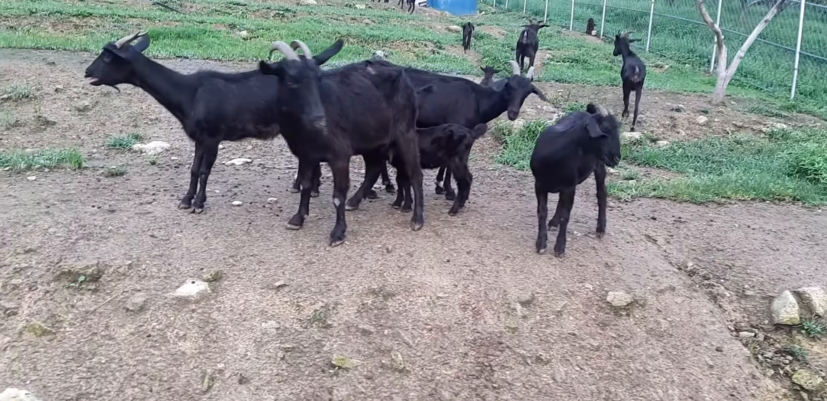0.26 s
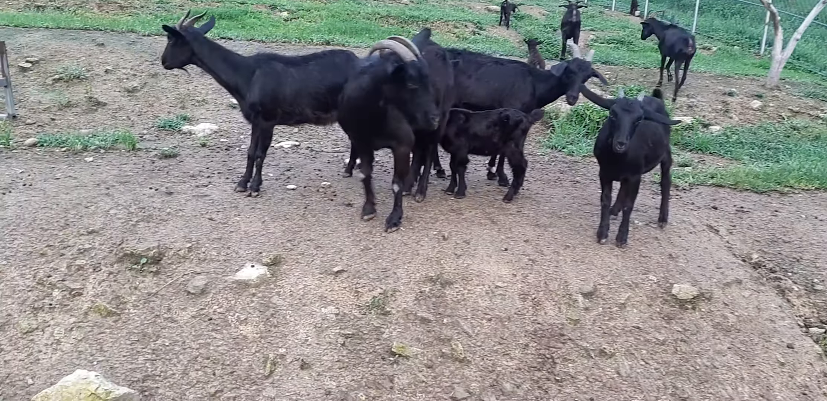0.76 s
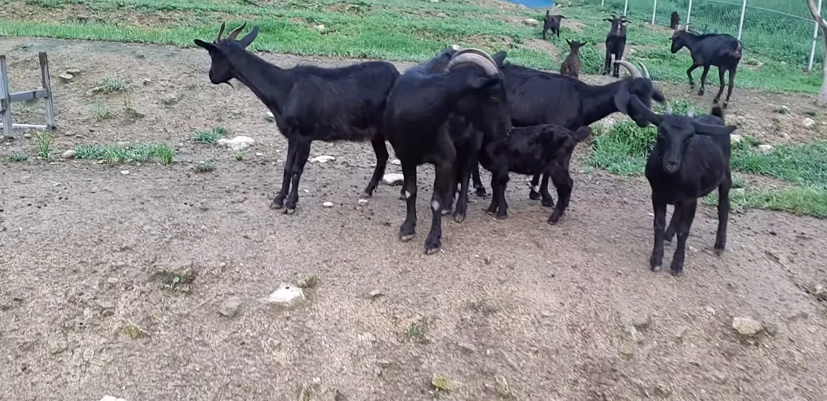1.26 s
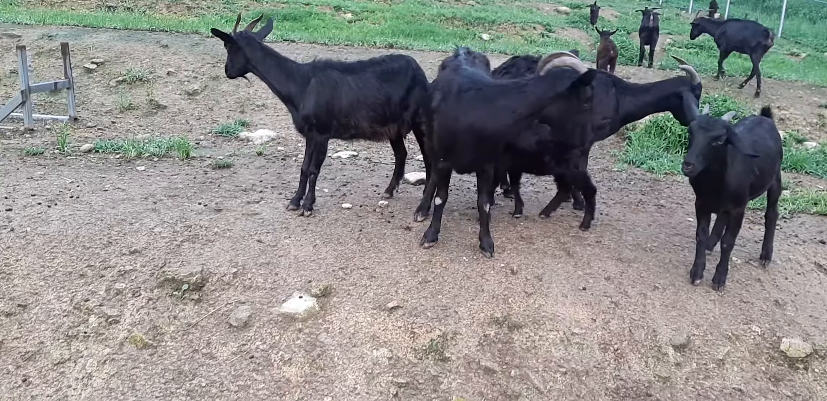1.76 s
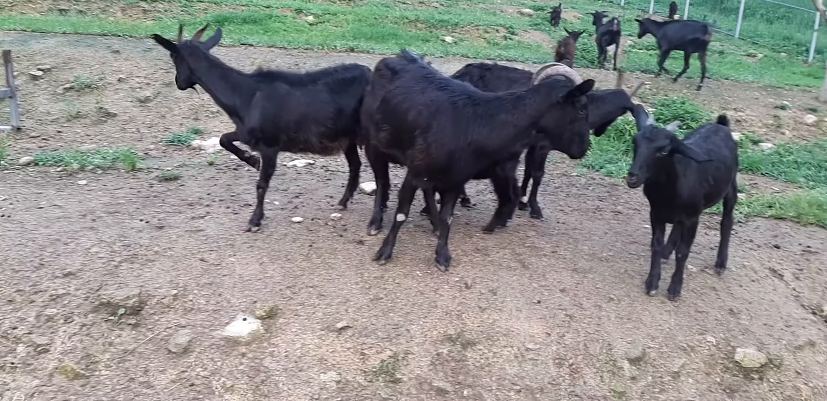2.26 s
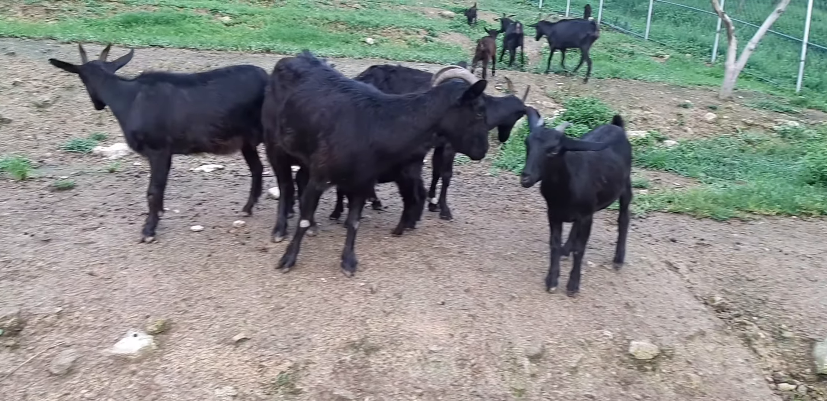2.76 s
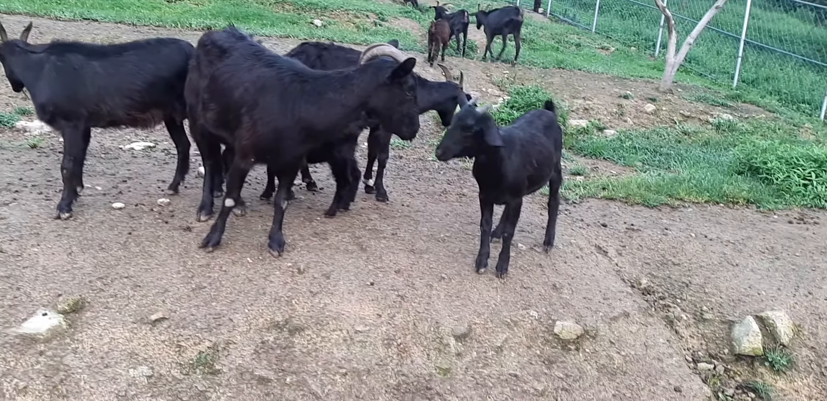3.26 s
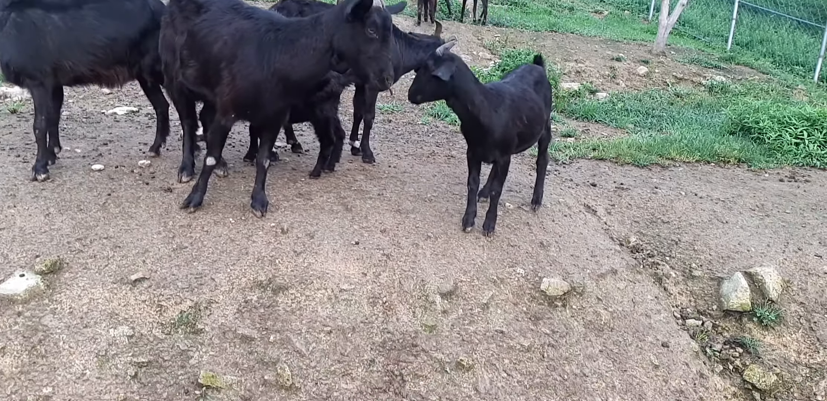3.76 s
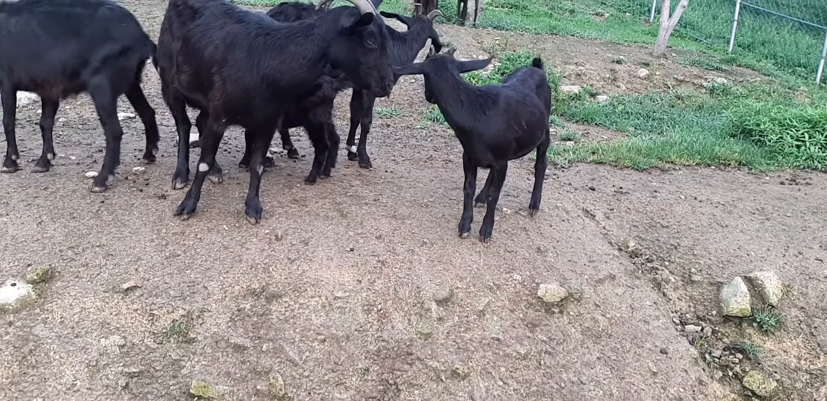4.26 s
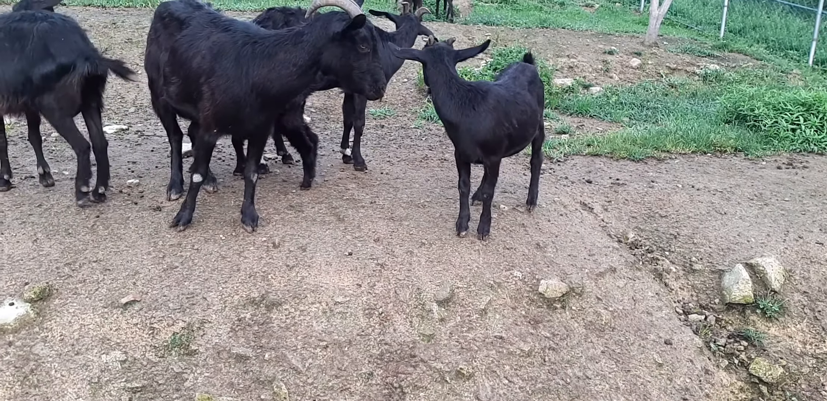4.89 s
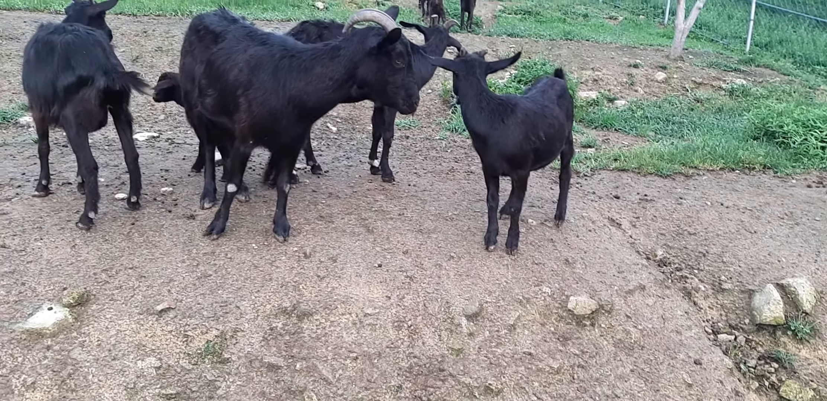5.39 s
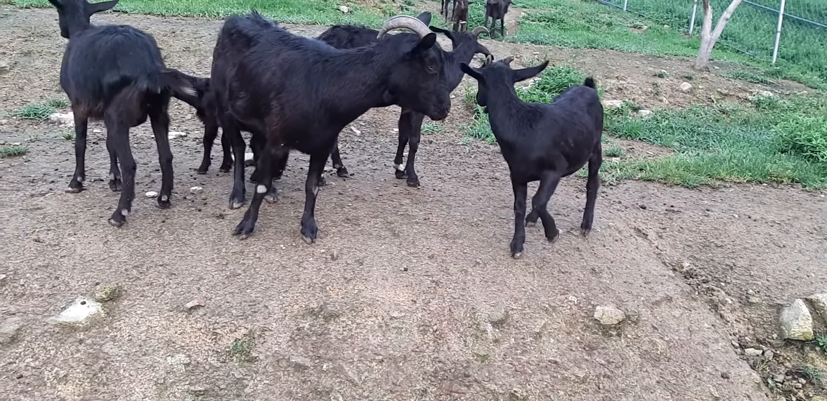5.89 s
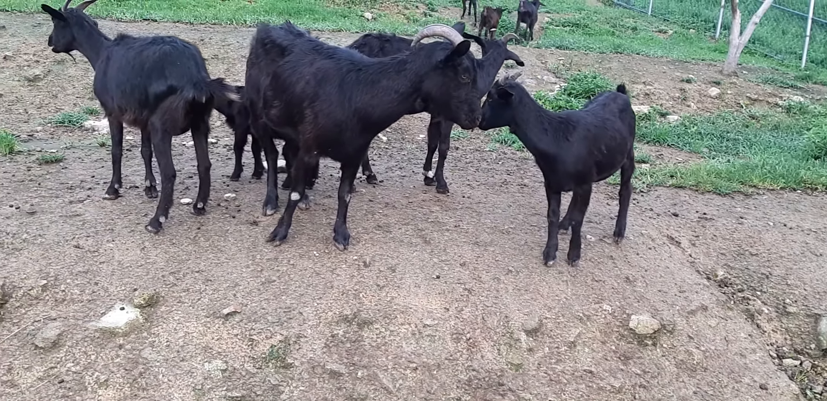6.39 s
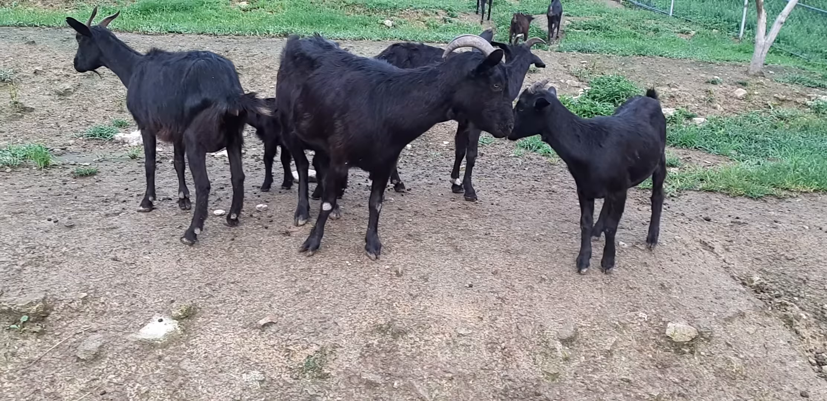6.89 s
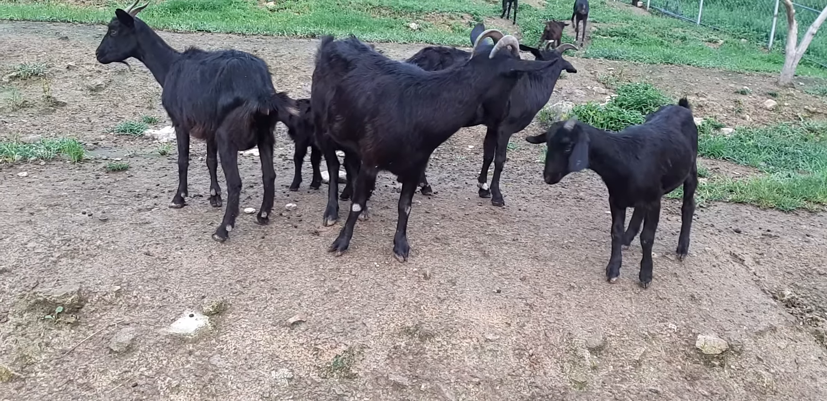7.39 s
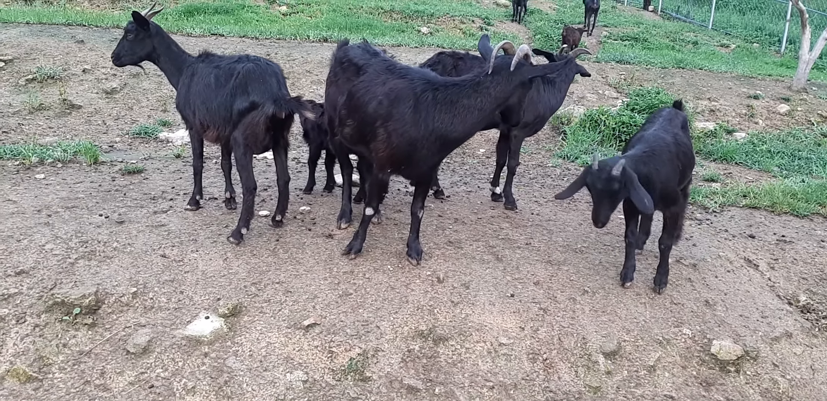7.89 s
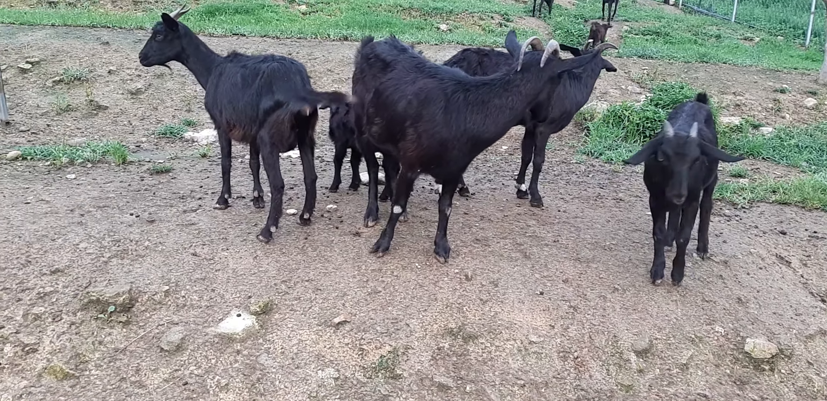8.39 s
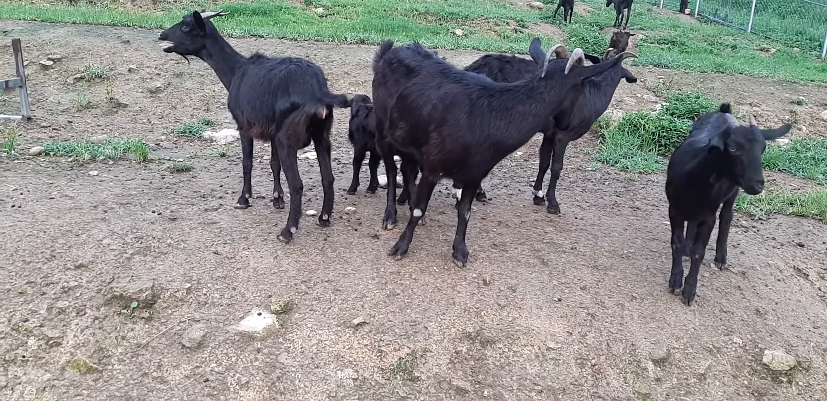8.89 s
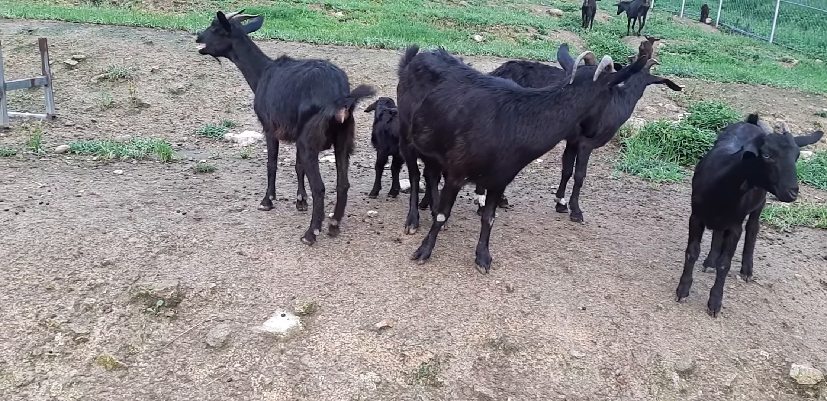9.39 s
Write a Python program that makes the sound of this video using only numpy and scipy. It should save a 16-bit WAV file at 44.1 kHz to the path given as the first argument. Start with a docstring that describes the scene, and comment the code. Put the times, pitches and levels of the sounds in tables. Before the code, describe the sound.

A close goat's raspy, throbbing bleat is already under way and quickly fades. A kid gives a clear, falling cry, then a hoarse adult answers with a long quaver. After fainter distant calls, she bleats again while a bird chatters. A quieter gap follows before the loudest bleat near the end. Insects hiss steadily, stronger on the right. Outdoor stereo pickup on an open hillside, with only a short dull echo.

```python
"""Two near goats bleat with a strong quaver; a kid gives one clear cry and others answer from further off.
Voices are larynx pulses and breath filtered by nose and throat; effort and throbs drive pitch and level.
A hoof thuds now and then (decaying sines), a far bird chatters (hoarse sine glides).
Insects hiss steadily, louder on the right (coloured noise and chirps), over faint air noise.
The open hillside scatters a short dull echo of goats, hooves and bird."""
import sys
import numpy as np
from scipy import signal
from scipy.fft import rfft, irfft, next_fast_len
from scipy.io import wavfile
from scipy.ndimage import uniform_filter1d, map_coordinates

SR = 44100
rng = np.random.default_rng(int(sys.argv[2]) if len(sys.argv) > 2 else 0)


def store_wav(level_fs):
    """Save 16-bit WAV to argv[1]."""
    pcm = np.round(np.clip(np.atleast_2d(level_fs), -1, 1) * 32767)
    wavfile.write(sys.argv[1], SR, pcm.T.astype(np.int16))


N = 425565

# quavering bleats by name: first_throb_s, last_throb_s, throb_count,
#   slowing (gap growth per squared distance from the quickest place), quickest_place (0-1),
#   full_pitch_hz, full_level_db, fading_db_per_s, first_effort (0-1), last_effort (0-1),
#   mouth_opens_s, muffling_until_then_db, lull_dip_db
QUAVERS = { "lead, tiring": (-.018, .447, 5, -.15, .6, 306, -28.8, 13, .98, .56, -.2, 0, 19),
           "lead, loud": (8.569, 9.671, 11, .68, .37, 319, -25.1, .8, .6, .68, 8.63, 13, 11),
           "doe, first": (2.62, 3.478, 9, .1, .55, 330, -26.8, 0, .47, .57, 2.715, 0, 11.5),
           "doe, second": (5.578, 6.286, 8, .2, .75, 326, -29, 0, .47, .95, 5.73, 7, 8),
           "far": (3.541, 4.096, 7, .33, .2, 358, -48.5, 11, .95, .92, 3.4, 0, 8.5)}
# single low pushes: centre_s, length_s, pitch_hz, glide_share_per_s, level_db, mouth_opening (0-1)
GRUNTS = [(.524, .08, 239, 0, -36, .72), (2.485, .12, 162, 1.5, -49, .02),
          (3.578, .08, 208, -3, -43.5, .15), (5.44, .09, 178, 0, -48.5, .03),
          (6.385, .19, 189, -.6, -46.5, .9), (8.44, .08, 186, 0, -51, .04)]
# held bleats by name: start_s, end_s, pitch_hz, level_db, attack_s, release_s, glide_share_per_s, waver_share
HELD = {
    "kid, yelp": (1.35, 1.44, 305, -40, .035, .035, 0, 0),
    "kid, lead-in": (1.465, 1.83, 343, -37.8, .045, .002, 0, 0),
    "low": (.6, 1.57, 210.5, -46.3, .012, .06, -.055, .11),
    "high": (5.47, 6.42, 475, -50, .05, .11, 0, .01),
    "first hum": (-.2, .48, 431, -43.5, .05, .02, 0, 0),
    "last hum": (9.25, 9.9, 432, -47.5, .065, .03, 0, 0),
    "thin": (7.95, 8.72, 1480, -61, .3, .05, 0, 0)}
# freely sliding bleats, level before the gain of the call: time_s, pitch_hz, level_db
KID_SLIDE = [(1.823, 347, -33), (1.835, 338, -27), (1.851, 335, -30), (1.913, 335, -27), (1.965, 322, -30),
             (2.019, 329, -29), (2.063, 320, -28), (2.085, 312, -32), (2.153, 305, -32), (2.193, 278, -35),
             (2.231, 243, -48), (2.255, 202, -46), (2.265, 204, -53)]
HIGH_SLIDE = [(0.31, 484.1, -58), (0.36, 465.3, -54), (0.436, 464.6, -52), (0.67, 510.7, -57),
              (0.79, 446.1, -56), (0.8, 454.7, -56)]
# nose and throat responses, relative level: frequency_hz, level_db
NOSE = [(110, -11.5), (190, 2.5), (260, -1), (420, -9), (700, -18.5), (1000, -14), (1400, -36.5),
        (2200, -29.5), (5000, -37), (16000, -68.5)]
LEAD_THROAT = [(150, -26.5), (310, -7), (560, -16.5), (760, 0), (880, 5.5), (1020, -6), (1350, -10.5),
               (1750, -26), (2200, -3.5), (2650, -12.5), (3250, -0.5), (4200, -5), (5500, -20),
               (7000, -46.5), (16000, -46)]
DOE_THROAT = [(150, -17.5), (310, 4.5), (470, -6.5), (640, -3.5), (900, -0.5), (1300, 3.5), (1750, -22.5),
              (2200, 10.5), (2600, -4), (3080, 9.5), (3800, -7), (5000, -18), (7000, -36.5), (16000, -53)]
DOE_CALLING_THROAT = [(150, -17), (310, 2.5), (600, -12.5), (920, 4.5), (1300, -2), (1700, -24.5),
                      (2220, 10.5), (2600, -7.5), (3300, 4), (4300, -17), (7000, -40), (16000, -54)]
KID_HALF_OPEN_THROAT = [(340, -9.5), (690, 0.5), (1030, 0), (1380, 3.5), (1720, -14), (2060, -25.5),
                        (2400, -5.5), (2750, -1.5), (3100, -15.5), (3700, -2), (4500, -18.5), (7000, -39.5),
                        (16000, -57)]
KID_OPEN_THROAT = [(320, -19), (660, -7.5), (970, 4.5), (1300, -20), (1650, -12), (1950, -10.5), (2450, -6),
                   (2850, -13.5), (3300, 1), (3700, -14.5), (4050, 0), (4650, -19.5), (5100, -12.5),
                   (7200, -48), (15000, -52)]
LOW_THROAT = [(210, -6), (425, 3), (630, -14), (850, -3), (1060, 6), (1280, -12), (1490, -7), (1750, -9),
              (2100, -9), (2550, 3.5), (2950, -21.5), (4200, -6.5), (16000, -70.5)]
HIGH_THROAT = [(470, -7), (960, 0), (1420, -4), (1880, -8), (2380, 0.5), (2850, 0), (3400, -7), (4150, 4),
               (5500, -21), (16000, -50)]
HUM_THROAT = [(250, -14), (430, -4.5), (860, -13), (1300, -19), (1750, -32), (2200, -20), (3500, -20.5),
              (16000, -93)]
FAR_THROAT = [(200, -12), (350, -0.5), (700, 1), (1060, 2.5), (1400, -10), (1750, -13), (2100, -8),
              (2450, -26), (2850, 4), (3600, -8), (6000, -30), (16000, -55)]
THIN_THROAT = [(700, 8), (1400, 4.5), (2900, -9), (4400, -16), (16000, -56)]
# hoof thuds, level before decay: start_s, level_db, pitch_hz
HOOVES = [(1.24, -57, 232), (2.188, -37.5, 271.7), (5.914, -43, 125), (9.365, -44, 155.3)]
# bird notes: time_s, nominal_length_s, first_pitch_hz, last_pitch_hz, level_db
BIRD = [(2.31, 0.046, 1860, 1780, -58.5), (5.128, 0.025, 2150, 2270, -70), (5.282, 0.05, 2360, 2270, -68),
        (5.438, 0.049, 1780, 2550, -52.5), (5.505, .06, 2527, 1715, -44.5), (5.655, 0.059, 1800, 2510, -52),
        (5.727, .06, 2436, 1790, -43.5), (6.875, 0.11, 1870, 1390, -61.5), (7.326, 0.065, 2030, 1910, -61),
        (7.362, 0.059, 1753, 1440, -58), (7.526, 0.053, 1730, 2020, -62), (7.746, 0.08, 1780, 2200, -64),
        (7.837, 0.13, 1800, 1320, -60.5), (8.307, .1, 1803, 1390, -61)]
# background spectra, relative density: frequency_hz, level_db_per_hz
INSECTS_LEFT = [(2700, -33.5), (3150, -28), (3400, 0.5), (3700, -4.5), (3950, 6.5), (4250, -5.5),
                (4800, -0.5), (5250, -3.5), (5800, -0.5), (6100, -10), (6500, -58), (7400, -61),
                (8300, -21.5), (9500, -42.5)]
INSECTS_RIGHT = [(2750, -53.5), (3150, -29.5), (3450, -16), (3850, -7), (4200, -17.5), (4600, -7),
                 (5300, -11.5), (5850, -8.5), (6250, -20.5), (6550, -31.5), (6950, -37.5), (8450, -22.5),
                 (9300, -33), (10500, -49.5)]
AIR = [(20, -27), (50, -8), (90, 1), (150, -5.5), (250, -16.5), (600, -18), (1400, -23.5), (3000, -28.5),
       (7000, -30.5), (11000, -28.5), (16000, -31.5)]

# hoarseness: jitter_share, shimmer_share, air_db
RAGGED, HARSH, HOARSE = (.03, .3, -2), (.017, .2, -5), (.013, .17, -7)
PLAIN, CLEAR = (.007, .14, -10), (.002, .04, -24)
# throb shape: pitch sag in the lull, flatness of the top, lean towards the end
SAG_SHARE, FLATNESS_POWER, LEAN = .155, 1.8, .14
# effort lifts pitch from rest; it builds and lets go exponentially
REST_HZ, EFFORT_ATTACK_S, EFFORT_RELEASE_S = 165, .17, .05
SLACK_DB, SLACK_POWER = 18, 1.4  # level lost with no effort; bend of that law
STRAIN_DB, STRAIN_FROM = 10, .9  # drives the treble up as effort passes this mark
EARLY_DIP_DB = 62  # deeper lulls between the first throbs
MOUTH_OPENS_S, WIDE_OPEN = .08, .89
SCOOP_SHARE, SCOOP_DB = .115, 7  # held bleats start and end flatter and softer
WAVER_HZ, WAVER_DIES_S = 10, .22
CUTOFF_HZ = 15800


def near_goats():
    """Two quavering adults reach the left first, the kid the right; all are louder on the right."""
    out = np.zeros((2, N))
    # the tiring bleat has lower resonances and more ragged pulses
    narrow_throat = np.array(LEAD_THROAT) * [.92, 1]
    tiring = quaver(QUAVERS["lead, tiring"], narrow_throat, RAGGED, edge=.5, thinning=.9, depth=1.15)
    add(out, *tiring, lead_ms=.12, pan_db=-4)
    loud = quaver(QUAVERS["lead, loud"], LEAD_THROAT, HARSH, edge=.75)
    add(out, *loud, lead_ms=.12, pan_db=-3.5)
    doe_first = quaver(QUAVERS["doe, first"], DOE_THROAT, HOARSE, edge=2.3, depth=1.12)
    add(out, *doe_first, lead_ms=.2, pan_db=-3)
    doe_second = quaver(QUAVERS["doe, second"], DOE_CALLING_THROAT, HOARSE, edge=2.3)
    add(out, *doe_second, lead_ms=.2, pan_db=-3)
    for row in GRUNTS:
        add(out, *grunt(*row), lead_ms=.18, pan_db=-3)
    for name in ("kid, yelp", "kid, lead-in"):
        add(out, *held(contour(HELD[name]), KID_HALF_OPEN_THROAT, CLEAR), lead_ms=-.18, pan_db=-6.5)
    cry = held(KID_SLIDE, KID_OPEN_THROAT, CLEAR, gain_db=2.5, edge=.7, onset_s=.008)
    add(out, *cry, lead_ms=-.17, pan_db=-5.5)
    return out


def quaver(bleat, throat, hoarseness, edge, thinning=.49, treble_dip_db=7, depth=1):
    """Effort sets pitch and level; about ten pushes a second lift loudness, pitch, rasp and brightness."""
    (first, last, count, slowing, quickest, full_hz, full_db, fading_db_per_s,
     first_effort, last_effort, opens_s, muffled_db, dip_db) = bleat
    beats = np.r_[first - .11, throb_times(first, last, count, slowing, quickest), last + .14]
    t = times(first - .06, last + .07)
    beat = np.interp(t, beats, np.arange(len(beats)))

    # each throb holds the effort of its moment; the change comes in the lull
    nearest = np.clip(beat.round().astype(int), 1, len(beats) - 2)
    moment = uniform_filter1d(beats[nearest], int(.05 * SR))
    unready = (1 - first_effort) * np.exp((first - moment) / EFFORT_ATTACK_S)
    letting_go = (1 - last_effort) * np.exp((moment - last) / EFFORT_RELEASE_S)
    effort = np.clip((1 - unready) * (1 - letting_go), 0, 1)
    opened = np.clip(.5 + (moment - opens_s) / MOUTH_OPENS_S, 0, 1)
    level_db = full_db - fading_db_per_s * (moment - first)
    level_db = level_db - SLACK_DB * (1 - effort) ** SLACK_POWER - muffled_db * (1 - opened)

    # a push builds slowly and lets go fast; the pitch arches over its middle
    push = np.pi * (beat + LEAN * np.sin(np.pi * beat) ** 2)
    slack = np.abs(np.sin(push)) ** FLATNESS_POWER
    sag = SAG_SHARE * depth * (1 - np.abs(np.cos(push)) ** 5)
    pitch_hz = (REST_HZ + (full_hz - REST_HZ) * effort) * (1 - sag + .008 * wobble(t, 30))

    # the folds turn ragged at the height of each push
    jitter, shimmer, air_db = hoarseness
    source = larynx(t, pitch_hz, jitter * (1 - .5 * slack), shimmer, air_db)
    voice = mouth(source, throat, np.maximum(WIDE_OPEN * opened, .09))

    # fundamental and treble fall furthest in the lulls; louder throbs have more edge
    bass = signal.sosfiltfilt(signal.butter(2, 480, fs=SR, output="sos"), voice)
    thinned = voice - np.clip(thinning, 0, 1) * slack * bass
    drive_db = level_db - np.median(level_db) + STRAIN_DB * (effort - STRAIN_FROM)
    voice = brighten(thinned, edge * drive_db - treble_dip_db * (slack - .25))
    lull_db = (dip_db + EARLY_DIP_DB * unready) * slack
    return t, voice * from_db(level_db - lull_db) * fade(t, .015)


def throb_times(first, last, count, slowing, quickest):
    """Throb gaps vary with squared distance from one place; positive slowing widens them away from it."""
    gaps = round(count) - 1
    lengths = 1 + slowing * ((np.arange(gaps) + .5) / gaps - quickest) ** 2
    return first + (last - first) * np.r_[0, np.cumsum(lengths)] / lengths.sum()


def grunt(centre_s, length_s, pitch_hz, glide, level_db, opening):
    """One low ragged push."""
    t = times(centre_s - length_s / 2, centre_s + length_s / 2)
    source = larynx(t, pitch_hz * (1 + glide * (t - centre_s)), *RAGGED)
    return t, mouth(source, DOE_THROAT, opening) * from_db(level_db) * fade(t, .035)


def held(rows, throat, hoarseness, gain_db=0, edge=.73, onset_s=.013):
    """A drawn-out bleat: hoarser voices tremble more, and swells are brighter."""
    s, pitch_hz, level_db = np.transpose(rows)
    t = times(s[0], s[-1] + .005)
    tremble = wobble(t, 16)
    jitter, shimmer, air_db = hoarseness
    level_db = np.interp(t, s, level_db) + (.3 + 5 * shimmer) * tremble
    pitch_hz = np.interp(t, s, pitch_hz) * (1 + .8 * jitter * tremble)
    source = larynx(t, pitch_hz, jitter, shimmer, air_db)
    steady = even(colour(source, throat), .03)
    voice = brighten(steady, edge * (level_db - np.median(level_db)))
    return t, voice * from_db(level_db + gain_db) * fade(t, onset_s)


def contour(bleat):
    """Scoop up, waver, settle and drop off, softer wherever flat: rows of time_s, pitch_hz, level_db."""
    start, end, pitch_hz, level_db, attack_s, release_s, glide, waver = bleat
    t = times(start, end)
    flat = SCOOP_SHARE * (np.exp((start - t) / attack_s) + np.exp((t - end) / release_s))
    flat = flat + waver * np.cos(np.pi * WAVER_HZ * (t - start)) ** 2 * np.exp((start - t) / WAVER_DIES_S)
    gliding_hz = pitch_hz * (1 + glide * (t - t.mean()))
    return np.transpose([t, gliding_hz * (1 - flat), level_db - SCOOP_DB * flat / SCOOP_SHARE])


def larynx(t, pitch_hz, jitter, shimmer, air_db):
    """Pulses of uneven spacing and strength, with a puff of bright air in each cycle."""
    phase = 2 * np.pi * np.cumsum(pitch_hz * (1 + jitter * wobble(t, 170))) / SR
    harmonics = int(SR / 2 / pitch_hz.max()) - 2
    pulses = rms_one(np.sin((harmonics + .5) * phase) / (np.sin(phase / 2) + 1e-12) - 1)
    # all-pass: the folds close along their length, which smears each pulse
    pulses = signal.lfilter([.77, -1.6, 1], [1, -1.6, .77], pulses)
    bright_noise = signal.lfilter([1, -.9], [1, -.55], white(t))
    breath = rms_one(bright_noise * (1 + np.cos(phase)))
    return pulses * (1 + shimmer * wobble(t, 130)) + from_db(air_db) * breath


def mouth(source, throat, opening):
    """The voice leaves by the nose or, as the mouth opens, through throat resonances; level held even."""
    opening = np.clip(opening, 0, 1)
    return even(opening * colour(source, throat) + (1 - opening) * colour(source, NOSE), .038)


def brighten(x, treble_db):
    """Lift or lower the treble, split at 2400 Hz."""
    body = signal.sosfiltfilt(signal.butter(2, 2400, fs=SR, output="sos"), x)
    return body + from_db(treble_db) * (x - body)


def far_goats():
    """The rest of the herd answers, fainter and louder on the right, with the same voice mechanism."""
    out = np.zeros((2, N))
    add(out, *held(contour(HELD["low"]), LOW_THROAT, PLAIN), lead_ms=-.04, pan_db=-5.5)
    add(out, *held(HIGH_SLIDE, HIGH_THROAT, PLAIN, gain_db=8.5), lead_ms=0, pan_db=-6)
    add(out, *held(contour(HELD["high"]), HIGH_THROAT, PLAIN), lead_ms=0, pan_db=-6)
    for name in ("first hum", "last hum"):
        add(out, *held(contour(HELD[name]), HUM_THROAT, PLAIN), lead_ms=-.021, pan_db=-3.5)
    far_quaver = quaver(QUAVERS["far"], FAR_THROAT, PLAIN, edge=.54, depth=.48)
    add(out, *far_quaver, lead_ms=-.037, pan_db=-6.5)
    add(out, *held(contour(HELD["thin"]), THIN_THROAT, PLAIN, edge=1.8), lead_ms=-.02, pan_db=-5)
    return out


def hooves(t60_s=.09):
    """Dull knocks on packed earth: rough sines that die away."""
    out = np.zeros((2, N))
    for s, level_db, pitch_hz in HOOVES:
        t = times(s, s + .086)
        knock = np.sin(2 * np.pi * pitch_hz * (t - s)) * (1 + .5 * wobble(t, pitch_hz / 2))
        decay = from_db(level_db - 60 * (t - s) / t60_s)
        add(out, t, knock * decay * fade(t, .0017), lead_ms=0, pan_db=-2)
    return out


def bird(rasp_share=.113):
    """Short sine glides, hoarse from fast random pitch motion."""
    out = np.zeros((2, N))
    for s, length_s, first_hz, last_hz, level_db in BIRD:
        t = times(s - length_s * .84, s + length_s * .7)
        glide_hz = np.interp(t, [s - length_s / 3, s + length_s / 2], [first_hz, last_hz])
        pitch_hz = glide_hz * (1 + rasp_share * wobble(t, 520))
        note = np.sin(2 * np.pi * np.cumsum(pitch_hz) / SR) * np.hanning(len(t))
        add(out, t, note * from_db(level_db), lead_ms=0, pan_db=-4)
    return out


def insects(left_db=-52, right_db=-43, trill_db=-53, chirp_s=.027, top_hz=4000, bottom_hz=3350):
    """A dense chorus merges into a hiss; one nearer singer repeats trills of four falling chirps."""
    left = from_db(left_db) * colour(rng.standard_normal(N), INSECTS_LEFT)
    right = from_db(right_db) * colour(rng.standard_normal(N), INSECTS_RIGHT)
    out = np.array([left, right])
    for s in np.cumsum(rng.uniform(.19, .27, size=42)):
        t = times(s, s + 4 * chirp_s)
        cycle = (t - t[0]) / chirp_s % 1
        pitch_hz = top_hz + (bottom_hz - top_hz) * cycle
        chirps = np.sin(2 * np.pi * np.cumsum(pitch_hz) / SR) * np.sin(np.pi * cycle)
        add(out, t, chirps * from_db(trill_db + 2 * rng.standard_normal()), lead_ms=0, pan_db=-4)
    return out


def air(shared_db=-69, own_db=-72):
    """A faint rumble common to both microphones and a thin hiss of their own."""
    low_pass = signal.butter(1, 500, fs=SR, output="sos")
    high_pass = signal.butter(1, 250, "high", fs=SR, output="sos")
    rumble = signal.sosfilt(low_pass, colour(rng.standard_normal(N), AIR))
    own = signal.sosfilt(high_pass, [colour(rng.standard_normal(N), AIR) for side in range(2)])
    return from_db(shared_db) * rms_one(rumble) + from_db(own_db) * rms_one(own)


def hillside(x, t60_s=.5, dull_hz=2800):
    """Ground, bushes and trees scatter a short dull tail."""
    t = times(0, .6)
    scatter = rng.standard_normal((2, len(t))) * from_db(-60 * t / t60_s) * np.minimum(t / .004, 1)
    scatter = signal.sosfilt(signal.butter(1, dull_hz, fs=SR, output="sos"), scatter)
    return signal.fftconvolve(x, rms_one(scatter) / np.sqrt(len(t)), axes=1)[:, :N]


def add(out, t, x, lead_ms, pan_db):
    """Place a sound: the left microphone hears it lead_ms sooner and pan_db louder."""
    at = np.round(t * SR).astype(int)
    inside = (at >= 0) & (at < N)
    gains = rms_one(from_db([pan_db, 0]))
    for channel, sign in enumerate((1, -1)):
        read_at = np.arange(len(x)) + sign * lead_ms * SR / 2000
        shifted = map_coordinates(x, [read_at], order=3)
        out[channel, at[inside]] += gains[channel] * shifted[inside]


def colour(x, spectrum):
    """Causal (minimum-phase) filter with the given spectrum; rms 1."""
    size = next_fast_len(len(x) + 4096, True) // 2 * 2
    hz, db = np.transpose(spectrum)
    grid_hz = np.maximum(np.arange(size // 2 + 1) * SR / size, 1)
    gain = from_db(np.interp(np.log(grid_hz), np.log(hz), db))
    # folding the cepstrum forward in time gives minimum phase
    cepstrum = irfft(np.log(gain))
    cepstrum[1:size // 2] *= 2
    cepstrum[size // 2 + 1:] = 0
    return rms_one(irfft(rfft(x, size) * np.exp(rfft(cepstrum)))[:len(x)])


def even(x, window_s):
    """Hold the running level at rms 1."""
    power = uniform_filter1d(x ** 2, max(int(window_s * SR), 2))
    return x / np.sqrt(np.abs(power) + 1e-9)


def wobble(t, rate_hz):
    """Random motion up to a given rate; rms 1."""
    return rms_one(signal.sosfilt(signal.butter(2, rate_hz, fs=SR, output="sos"), white(t)))


def white(t):
    """White noise for a stretch, repeating after 2 s."""
    return np.resize(rng.standard_normal(2 * SR), len(t))


def fade(t, edge_s):
    """Linear soft start and end."""
    return np.clip(np.minimum(t - t[0], t[-1] - t) / edge_s, 0, 1)


def times(start, end):
    """Sample times of a stretch, in seconds."""
    return np.arange(round(start * SR), round(end * SR)) / SR


def rms_one(x):
    """Scale to rms 1."""
    return x / np.sqrt(np.mean(x ** 2) + 1e-20)


def from_db(db):
    """Decibels to amplitude."""
    return 10 ** (np.asarray(db) / 20)


def scene():
    """Direct sounds, their hillside echo (strongest for the bird), and the background."""
    near = near_goats() + hooves()
    far = far_goats()
    song = bird()
    echo = hillside(from_db(-28) * near + from_db(-20) * far + from_db(-12) * song)
    return near + far + song + echo + insects() + air()


def record(dry):
    """A steep low-pass cuts the top."""
    return signal.sosfilt(signal.ellip(10, .1, 80, CUTOFF_HZ, fs=SR, output="sos"), dry)


dry = scene()
out = record(dry)
store_wav(out)
```